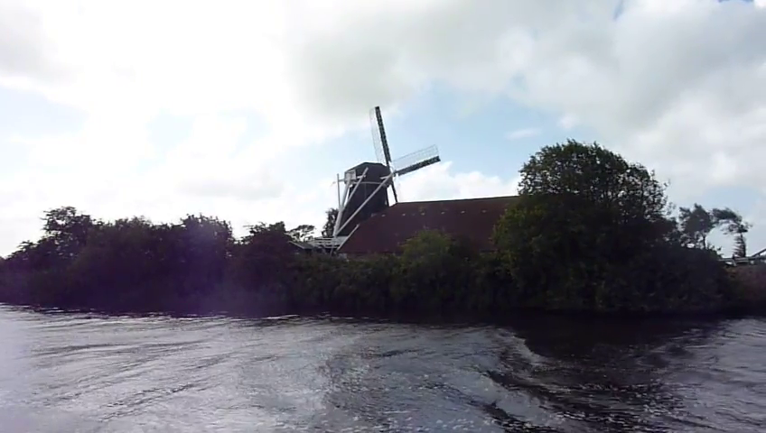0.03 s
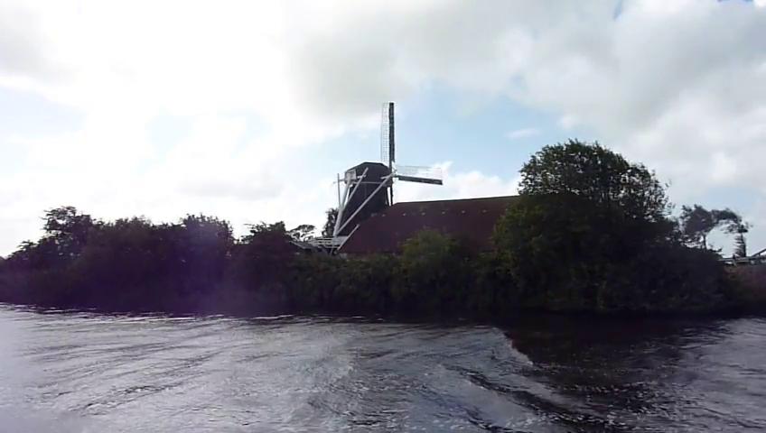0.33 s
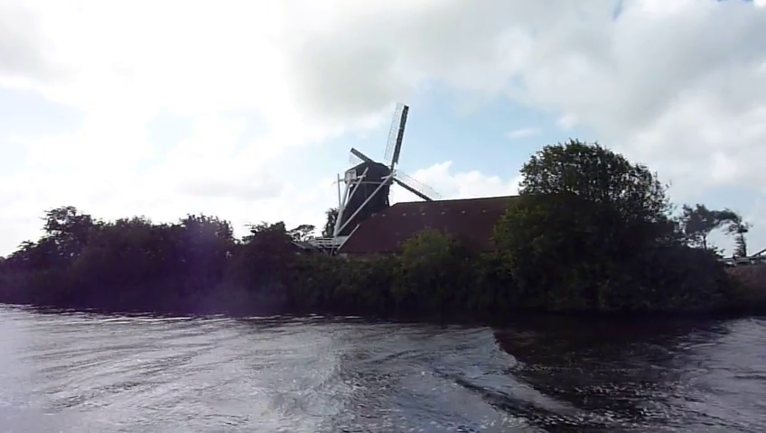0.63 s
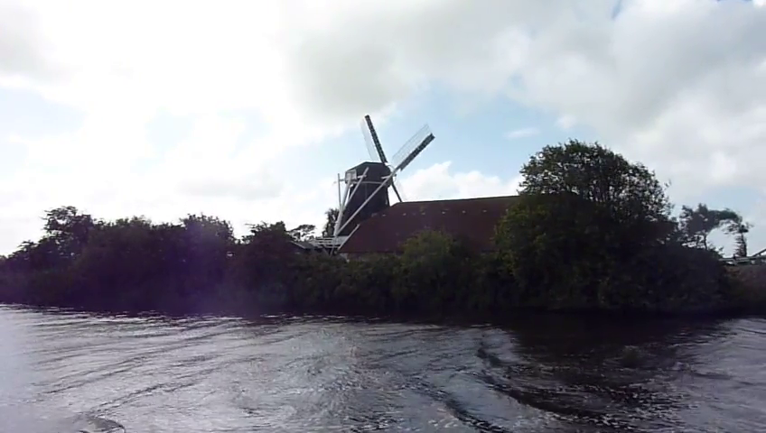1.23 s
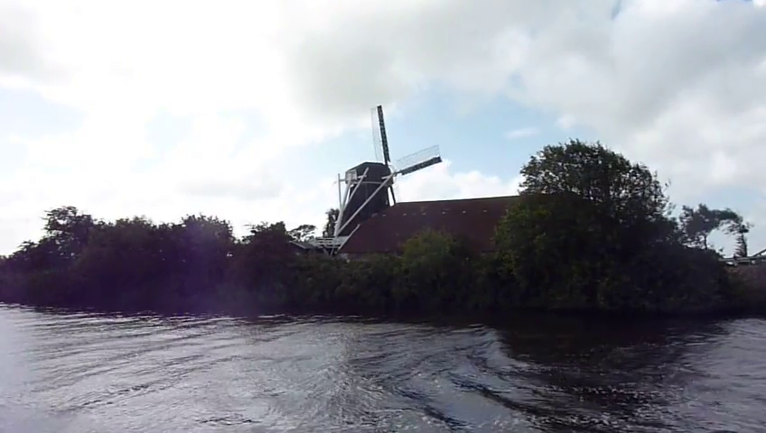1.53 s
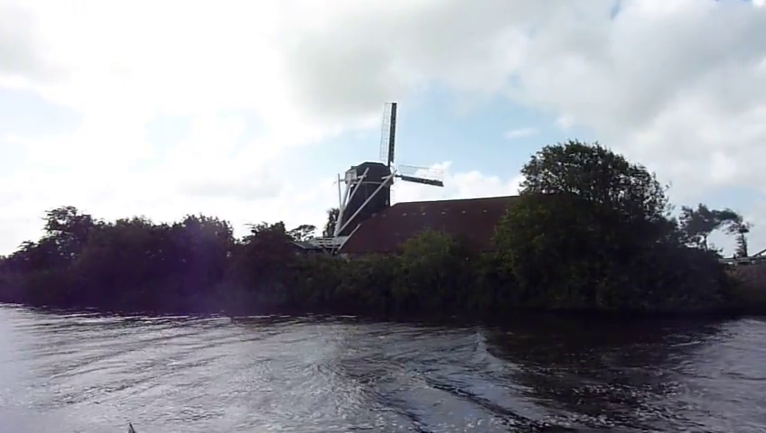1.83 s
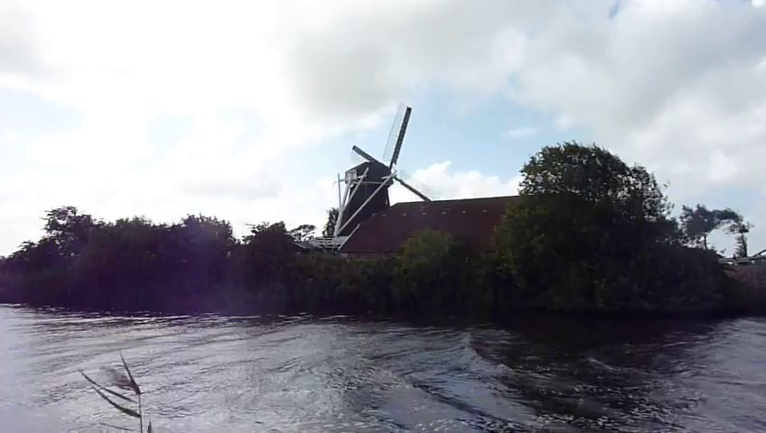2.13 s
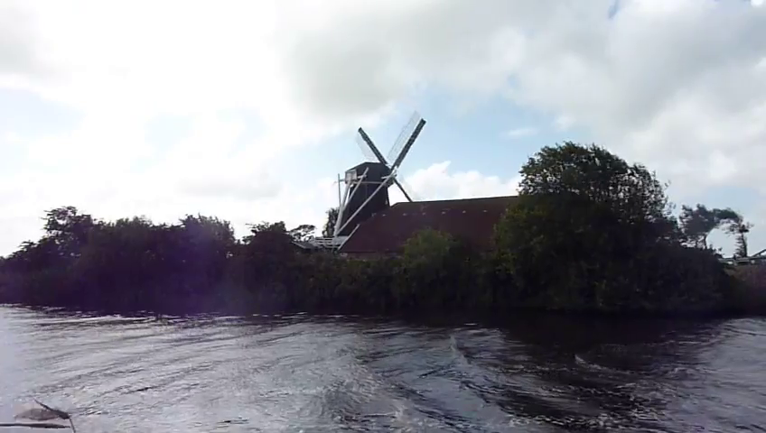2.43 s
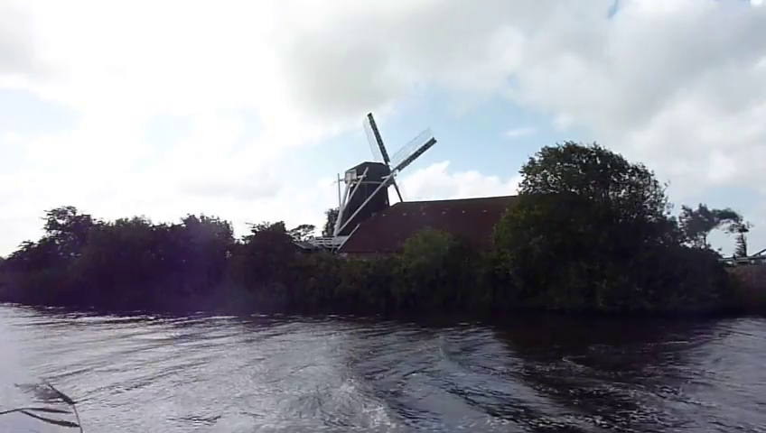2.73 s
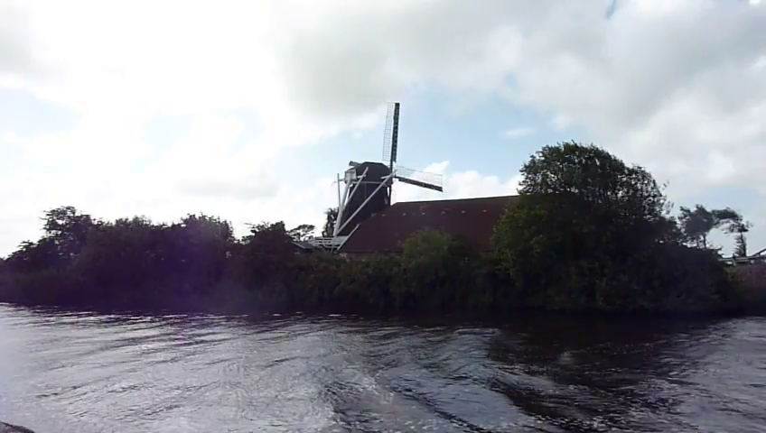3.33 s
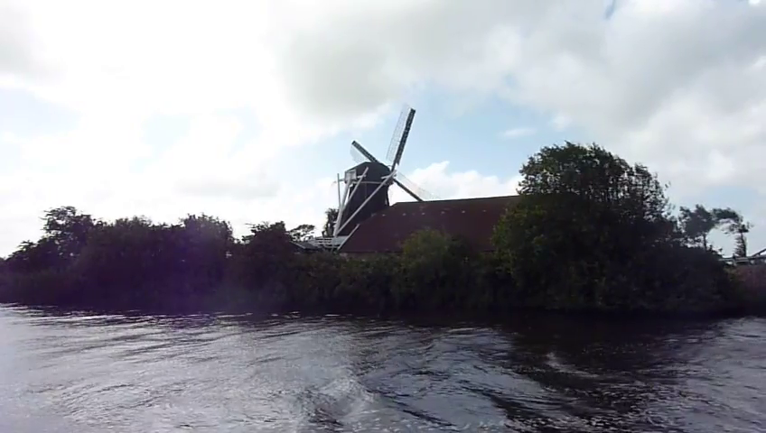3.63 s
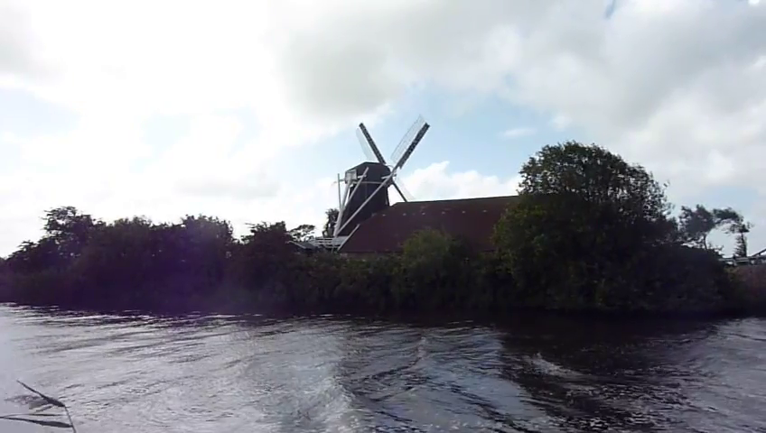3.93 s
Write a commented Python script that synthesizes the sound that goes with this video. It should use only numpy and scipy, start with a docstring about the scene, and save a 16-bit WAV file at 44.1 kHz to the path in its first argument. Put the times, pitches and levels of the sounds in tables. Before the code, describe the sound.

Wind buffets a small microphone aboard a boat on a river. An early gust eases into a low rumble, then stronger gusts thump and crackle near the end, while the boat's wash hisses faintly behind.

```python
"""A breeze rumbles on a small camera's microphone, aboard a boat moving along a river.
Gusts tear across the port, brighter the faster they blow; the flow cracks as it tears off.
Single eddies thump the port: a push, then suction.
Behind them foam and spray hiss in the boat's wash. The hiss follows a set level curve:
it swells, then ducks where the camera turns its gain down in strong gusts."""
import sys
import numpy as np
from scipy import signal
from scipy.fft import rfft, irfft
from scipy.io import wavfile

SR = 44100
rng = np.random.default_rng(int(sys.argv[2]) if len(sys.argv) > 2 else 0)


def materialize(psi):
    """Save the field psi as 16-bit PCM at rate SR to the path in sys.argv[1].

    A 1-D psi becomes a single channel; in a 2-D psi each row is a channel.
    """
    bounded = np.clip(np.atleast_2d(psi).T, -1, 1)
    quanta = np.round(bounded * 32767).astype(np.int16)
    wavfile.write(sys.argv[1], SR, quanta)


N = 176400

# breeze on the port (time [s], level [dB])
BREEZE_LEVEL = [(0, -27.5), (.2, -34.5), (.5, -31), (.59, -35), (.86, -33.5), (.94, -40), (1.0, -26),
                (1.09, -30), (1.25, -27.5), (1.5, -30.5), (1.82, -32), (1.92, -25), (2.15, -33), (2.3, -26),
                (2.7, -29), (3.1, -24.5), (3.29, -30.5), (3.6, -25), (4.0, -30)]
BREEZE_KNEE_HZ = 208
# gusts (start [s], length [s], level [dB], spectral knee [Hz])
GUST_EVENTS = [ (0.104, 0.0082, -28, 357), (.233, 0.022, -25.5, 503), (0.269, 0.011, -23, 330),
               (0.282, 0.015, -18.5, 510), (0.302, 0.097, -27, 318), (0.382, 0.009, -12.5, 513),
               (0.394, 0.024, -18.5, 1620), (0.42, .06, -19.5, 520), (0.48, 0.017, -26, 360),
               (0.639, 0.0069, -17.5, 556), (0.648, 0.033, -20, 930), (0.709, .056, -20.5, 790),
               (0.774, 0.046, -24, 700), (0.86, 0.0061, -29.5, 345), (1.563, .04, -26.5, 254),
               (1.705, 0.016, -25.5, 324), (1.739, 0.033, -25.5, 408), (2.193, 0.04, -21, 250),
               (2.26, 0.0058, -24.5, 336), (2.362, 0.025, -26, 294), (2.483, 0.021, -18, 398),
               (2.523, 0.036, -28.5, 280), (2.588, 0.017, -21, 292), (2.843, .038, -21.5, 290),
               (2.881, 0.057, -12.5, 397), (2.948, 0.0087, -17.5, 527), (3.019, 0.0073, -13, 430),
               (3.046, 0.028, -17, 474), (3.086, 0.083, -25, 480), (3.145, 0.047, -17, 665),
               (3.189, 0.055, -17, 685), (3.396, 0.042, -21.5, 290), (3.455, 0.018, -15, 345),
               (3.497, 0.022, -17.5, 320), (3.563, 0.076, -15.5, 800), (3.643, 0.074, -20.5, 580),
               (3.751, 0.04, -18.5, 366), (3.808, 0.035, -19, 470), (3.941, 0.022, -21, 365)]
GUST_ATTACK_S, GUST_RELEASE_S, GUST_KNEE_EXPONENT = 0.0082, 0.014, 0.32
# flow tearing off the port (time [s], level [dB], spectral knee [Hz])
CRACK_EVENTS = [(0.411, -9, 1700), (2.913, -2.5, 910), (3.028, -5.5, 800), (3.044, -12, 1010),
                (3.232, -17, 1200), (3.678, -17.5, 800), (3.795, -24, 700), (3.826, -22, 650)]
CRACK_S = 0.0013
# port response to wind (frequency [Hz], gain [dB])
PORT_RESPONSE = [(20, -17.5), (40, -6), (80, 0.5), (150, 0), (300, -2), (550, -3.5), (900, -4.5),
                 (1500, -2.5), (2300, 0), (3200, -1.5), (4300, -6.5), (5600, -11.5), (8500, -19)]
ROLL_OFF_EXPONENT, SWIRL_CUTOFF_RATIO = 3.883, 4.4  # swirls die out at this multiple of the knee
FLUTTER_DB, FLUTTER_RATE_HZ = 3, 39
CRACKLE_DB, CRACKLE_RATE_HZ, CRACKLE_CORNER_HZ = 7.5, 250, 900
# eddies hitting the port (time [s], level [dB], pitch [Hz])
EDDY_EVENTS = [(.447, -6, 200), (0.524, -18, 156), (1.036, -8.5, 115), (1.157, -15.5, 150),
               (1.611, -12.5, 120), (2.061, -11, 110), (2.202, -14, 110), (2.373, -9, 130),
               (2.485, -11, 130), (2.616, -22, 120), (2.932, -20, 130), (3.027, -3.5, 169),
               (3.058, -3, 130), (3.339, -12, 110), (3.535, -5, 130), (3.597, -9.5, 110), (3.683, -3, 140),
               (3.793, -6.5, 190)]
EDDY_WIDTH_CYCLES = 0.6
EDDY_WAKE_DB, EDDY_WAKE_S, EDDY_KNEE_RATIO = -10.5, 0.0044, 3.1
# wash hiss, including the camera's gain dips in strong gusts (time [s], level [dB])
WASH_LEVEL = [(0, -55), (.55, -57), (.9, -55), (1.2, -51.5), (1.5, -49), (2.0, -46), (2.4, -44),
              (2.83, -42.5), (3.0, -47), (3.1, -50.5), (3.48, -46.5), (3.68, -56), (3.85, -48.5),
              (4.0, -48.5)]
# wash spectrum (frequency [Hz], relative density [dB])
WASH_SPECTRUM = [(200, -2.5), (600, 1.5), (1200, 2.5), (2100, -1), (3000, -3), (4500, -3.5), (6000, -3.5),
                 (7200, -7), (8300, -9.5)]
WASH_FLICKER_DB, WASH_FLICKER_RATE_HZ = 0.88, 24
SPRAY_DB, SPRAY_PER_S = -10.5, 440
# dips in the camera's response (centre [Hz], width [Hz])
CAMERA_NOTCHES = [(5430, 480), (7620, 260)]
CAMERA_CUTOFF_HZ = 8000


def undb(db):
    return 10 ** (np.asarray(db) / 20)


def unit_rms(x):
    return x / np.sqrt(np.mean(x ** 2))


def decay(x):
    return np.exp(-np.minimum(x, 20))


def level_curve(rows):
    """Gain per sample from (time [s], level [dB]) rows."""
    return undb(np.interp(np.arange(N) / SR, *np.array(rows).T))


def gain_at(rows, hz):
    """Gain at hz from (frequency [Hz], gain [dB]) rows."""
    row_hz, db = np.array(rows).T
    return undb(np.interp(np.log(hz + 1e-9), np.log(row_hz), db))


def wander(rate_hz):
    """Smooth random drift, rms 1."""
    hz = np.fft.rfftfreq(N, 1 / SR)
    lowpass = np.exp(-2 * (hz / rate_hz) ** 2)
    return unit_rms(irfft(rfft(rng.standard_normal(N)) * lowpass, N))


def half_octaves(x):
    """Yield overlapping bands of x as (centre [Hz], band at rms 1)."""
    octave = np.log2(np.fft.rfftfreq(N, 1 / SR) + 1e-9)
    spectrum = rfft(x)
    for hz in 22 * 2 ** np.arange(0, 9, .5):
        offset = np.clip(2 * (octave - np.log2(hz)), -1, 1)
        window = np.cos(np.pi / 2 * offset) ** 2
        yield hz, unit_rms(irfft(spectrum * window, N))


def airflow():
    """Summed power and power-weighted knee [Hz] of breeze, gusts, cracks and eddy wakes."""
    t = np.arange(N) / SR
    flows = [(level_curve(BREEZE_LEVEL), BREEZE_KNEE_HZ)]
    for start_s, length_s, db, knee_hz in GUST_EVENTS:
        before_s = np.maximum(start_s - t, 0)
        after_s = np.maximum(t - start_s - length_s, 0)
        envelope = decay(before_s / GUST_ATTACK_S + after_s / GUST_RELEASE_S)
        flows.append((undb(db) * envelope, knee_hz * envelope ** GUST_KNEE_EXPONENT))
    for time_s, db, knee_hz in CRACK_EVENTS:
        crack = undb(db) * decay(abs(t - time_s) / CRACK_S)
        flows.append((crack, knee_hz))
    for time_s, db, pitch_hz in EDDY_EVENTS:
        wake = undb(db + EDDY_WAKE_DB) * decay(abs(t - time_s) / EDDY_WAKE_S)
        flows.append((wake, EDDY_KNEE_RATIO * pitch_hz))
    power = sum(amplitude ** 2 for amplitude, _ in flows)
    knee_moment = sum((amplitude * knee_hz) ** 2 for amplitude, knee_hz in flows)
    return power, np.sqrt(knee_moment / power)


def turbulence():
    """Pressure noise at the port, steep above the knee; slow air flutters most, small swirls crackle."""
    power, knee_hz = airflow()
    flutter = undb(FLUTTER_DB * wander(FLUTTER_RATE_HZ) * BREEZE_KNEE_HZ / knee_hz)
    crackle_db = CRACKLE_DB * wander(CRACKLE_RATE_HZ)
    pressure, total_share = 0, 0
    for hz, band in half_octaves(rng.standard_normal(N)):
        ratio = hz / knee_hz
        density = decay((ratio / SWIRL_CUTOFF_RATIO) ** 2) / (1 + ratio ** ROLL_OFF_EXPONENT)
        share = hz * density * gain_at(PORT_RESPONSE, hz) ** 2  # bandwidth grows with hz
        spurts = unit_rms(undb(crackle_db * hz / (hz + CRACKLE_CORNER_HZ)))
        pressure += np.sqrt(share) * band * spurts
        total_share += share
    return pressure * flutter * np.sqrt(power / total_share)


def eddy_thumps():
    """Each eddy pushes on the port, then sucks at it in passing."""
    t = np.arange(N) / SR
    pressure = np.zeros(N)
    for time_s, db, pitch_hz in EDDY_EVENTS:
        cycles = (t - time_s) * pitch_hz
        envelope = undb(db) * decay((cycles / EDDY_WIDTH_CYCLES) ** 2)
        pressure -= envelope * np.sin(2 * np.pi * cycles)
    return pressure


def wash():
    """Foam hisses along the boat's wake, with a fine spray of bursting bubbles."""
    foam = rng.standard_normal(N)
    bursts = rng.random(N) < SPRAY_PER_S / SR
    spray = undb(SPRAY_DB) * unit_rms(bursts * rng.standard_normal(N))
    hiss = np.zeros(N)
    for hz, band in half_octaves(foam + spray):
        flicker = undb(WASH_FLICKER_DB * wander(WASH_FLICKER_RATE_HZ))
        hiss += band * np.sqrt(hz) * gain_at(WASH_SPECTRUM, hz) * flicker
    return unit_rms(hiss) * level_curve(WASH_LEVEL)


def scene():
    """Wind on the microphone over the wash, mono."""
    return (turbulence() + eddy_thumps() + wash())[None]


def record(dry):
    """Camera: soft clip, two notches, steep low-pass."""
    x = np.tanh(0.64 * dry) / 0.74
    for hz, width_hz in CAMERA_NOTCHES:
        x = signal.lfilter(*signal.iirnotch(hz, Q=hz / width_hz, fs=SR), x)
    lowpass = signal.ellip(10, rp=.2, rs=80, Wn=CAMERA_CUTOFF_HZ, fs=SR, output="sos")
    return signal.sosfilt(lowpass, x)


dry = scene()
out = record(dry)
materialize(out)
```